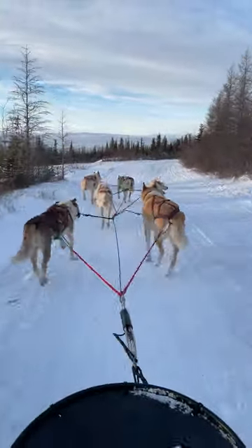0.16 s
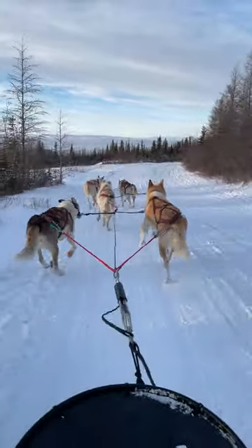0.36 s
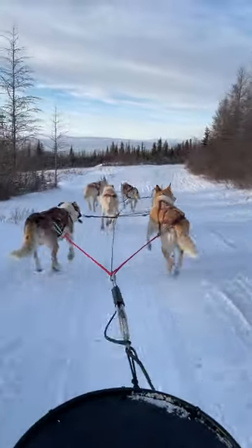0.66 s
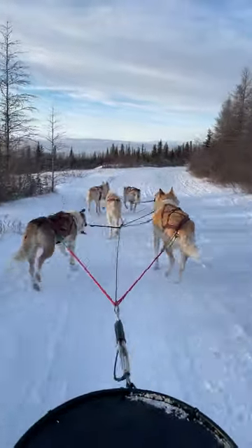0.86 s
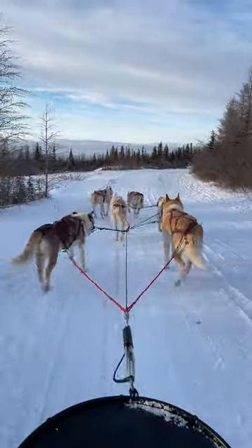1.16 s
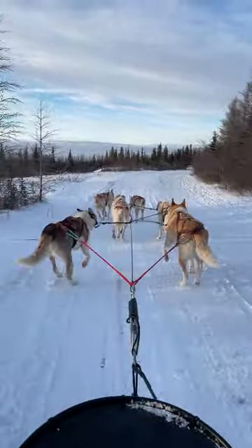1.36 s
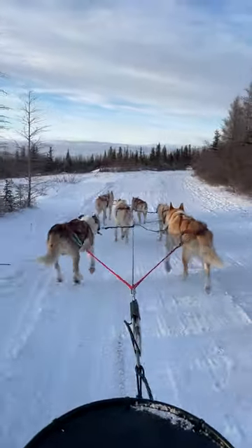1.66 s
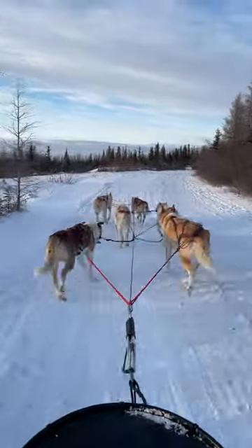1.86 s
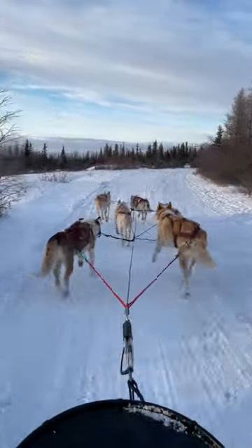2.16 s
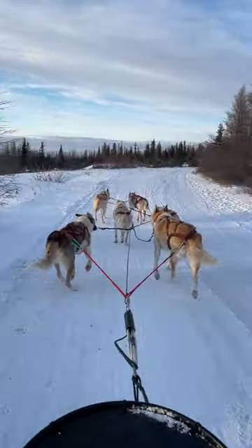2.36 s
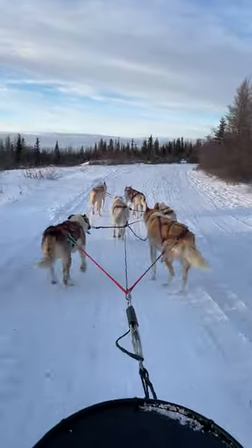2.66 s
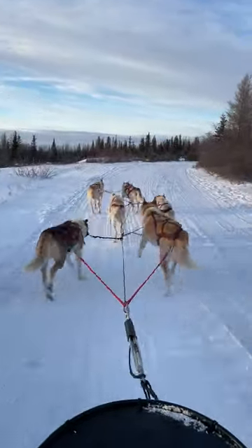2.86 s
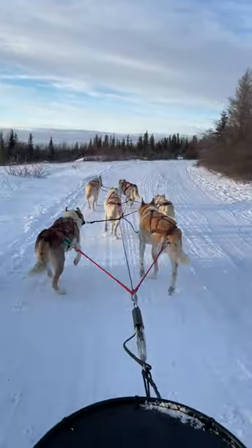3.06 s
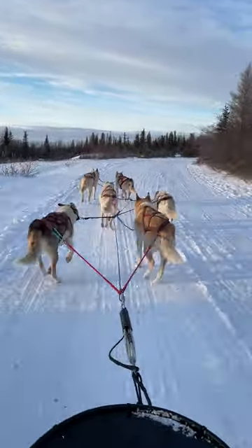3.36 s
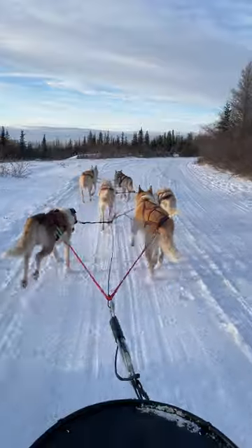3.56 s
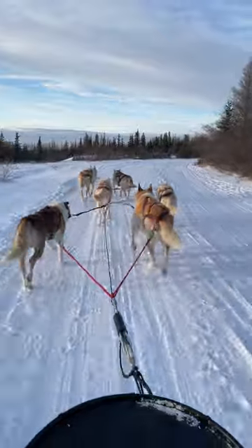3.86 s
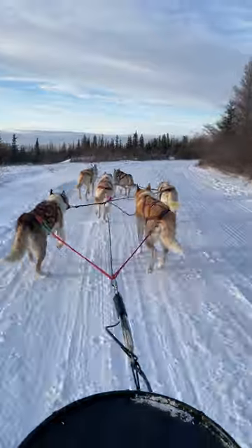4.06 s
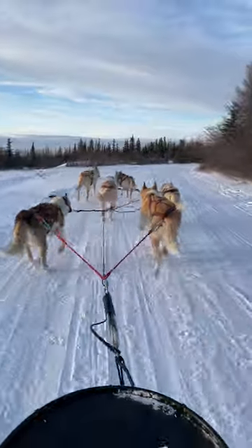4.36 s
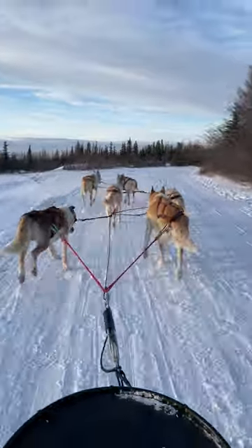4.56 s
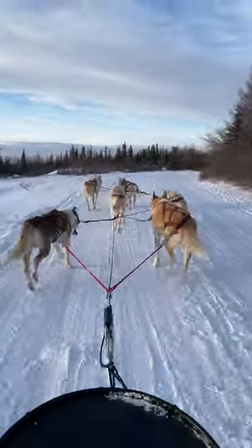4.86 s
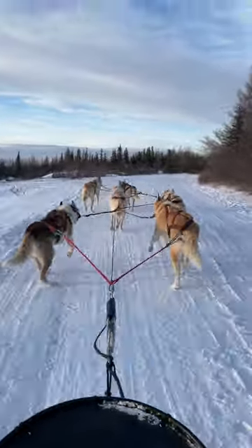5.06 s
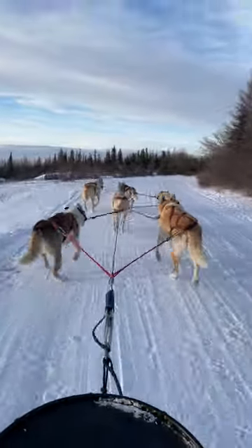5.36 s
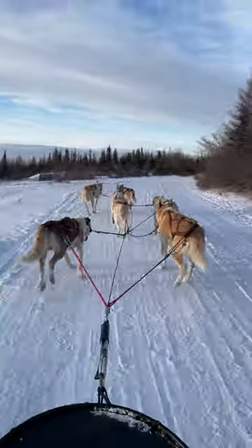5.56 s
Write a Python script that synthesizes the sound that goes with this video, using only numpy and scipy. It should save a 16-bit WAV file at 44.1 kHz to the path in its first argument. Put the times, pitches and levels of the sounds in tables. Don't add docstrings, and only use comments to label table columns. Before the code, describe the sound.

Close on a moving dog sled outdoors: runners scrape and hiss lightly over packed snow with small metallic clicks and soft wooden thumps. After about two seconds the ride roughens, the hull booming and crust crunching. A cluster of hard cracks and slams comes just before four seconds, another heavy knock follows near 4.4, then rough drumming continues. Handheld phone above the bow, wide close stereo, no voices or barking.

```python
import sys
import numpy as np
from scipy import signal
from scipy.fft import rfft, irfft
from scipy.io import wavfile
from scipy.ndimage import uniform_filter1d

SR = 44100
rng = np.random.default_rng(int(sys.argv[2]) if len(sys.argv) > 2 else 0)


def output_pcm(signal):
    pcm = np.clip(np.atleast_2d(signal).T, -1, 1) * 32767
    wavfile.write(sys.argv[1], SR, np.round(pcm).astype(np.int16))


def elevation(decibels):
    levels = np.asarray(decibels, float)
    return 10 ** (levels / 20)


N = 251370


def unit(x):
    return x / np.sqrt(np.mean(x ** 2))


def peak(x, level_db):
    return elevation(level_db) * x / abs(x).max()


def ring(x, hz, width_hz):
    return signal.lfilter(*signal.iirpeak(hz, hz / width_hz, fs=SR), x)


def body(x, modes):
    total = 0
    for k, (hz, width_hz, level_db) in enumerate(modes):
        rung = ring(ring(x, hz, width_hz), hz, 2 * width_hz)
        total = total + (-1) ** k * elevation(level_db) * rung
    return total


def walk(rate_hz):
    hold = int(SR / rate_hz)
    held = np.repeat(rng.standard_normal(N // hold + 1), hold)
    return 1.44 * uniform_filter1d(uniform_filter1d(held, hold), hold)[:N]


def grit(rate_hz, spread_db, smear_s):
    grain_db = spread_db * np.minimum(rng.exponential(size=N), 4)
    hits = (rng.random(N) < rate_hz / SR) * elevation(2 * grain_db)
    power = signal.lfilter([1], [1, -np.exp(-1 / (smear_s * SR))], hits)
    return unit(np.sqrt(power + 0.7 * power.mean()) * rng.standard_normal((2, N)))


def burst(length_ms, edge_ms):
    t_ms = np.arange(int(0.08 * SR)) / SR * 1000
    shape = np.clip(t_ms / edge_ms, 0, 1) * np.exp(-(t_ms / length_ms) ** 3)
    return shape * rng.standard_normal((2, len(t_ms)))


def add(out, start_s, sound):
    i = int(start_s * SR)
    out[..., i:i + sound.shape[-1]] += sound[..., :N - i]


def drum(events, rise_cycles):
    out = np.zeros((2, N))
    for start_s, level_db, pitch_hz, cycles in events:
        phase = rng.random((2, 1))
        n = np.arange(int(3 * SR * cycles / pitch_hz)) * pitch_hz / SR
        swell = (1 - np.exp(-n / rise_cycles)) * np.exp(-(2.27 * n / cycles) ** 1.15)
        add(out, start_s, peak(swell, level_db) * np.sin(2 * np.pi * (n + phase)))
    return out


def trail():
    # start_s, runner_pressure_db, frame_bounce_db, hull_lean_left_minus_right_db, crust_crispness_db
    course = [(0, -41.5, -31, 3.5, -2), (.25, -43, -37.5, -8, 1.5), (.42, -48.5, -39, -2.5, -1.5),
              (.82, -49, -42, -6, 4), (.98, -46.5, -40.5, 1, -1), (1.5, -48, -28, -1, 1),
              (1.8, -46.5, -32, 2, 1), (2.1, -40, -28, -1.5, 1), (2.33, -43, -30, -2, -2.5),
              (2.65, -39.5, -26, -3.5, 1), (3.35, -39, -27.5, -3, -2), (3.78, -39, -28.5, -12, 3),
              (3.86, -46, -27.5, -12, 1), (4.03, -40, -31.5, -3.5, 4.5), (4.5, -37.5, -28.5, -5, -2),
              (5.05, -40, -28.5, -2.5, -2.5), (5.3, -43, -31, -9, 0.5), (5.7, -38, -25, -2, -3)]
    start_s, *columns = np.transpose(course)
    return [np.interp(np.arange(N) / SR, start_s, column) for column in columns]


def ridges():
    # start_s, bite_db, length_ms
    packed = [(.09, 4.5, 140), (.525, 10.5, 106), (.71, 10, 86), (.84, 8, 38), (.905, -1, 50),
              (1.075, 4, 45), (1.13, 5.5, 210), (1.22, 9, 39), (1.313, 8, 45), (1.43, 4, 32),
              (1.505, 6, 70), (1.94, 2.5, 72), (2.09, 3, 154), (2.331, -6, 21), (2.52, 3.5, 150),
              (2.75, 1, 90), (2.81, 2.5, 81), (3.019, 5.5, 44), (3.14, -3, 49), (3.49, 2, 11),
              (3.75, 12.5, 95), (3.86, 11, 160), (3.95, 8.5, 136), (4.41, 4, 21), (5.2, 3, 470),
              (5.51, 0.5, 38), (5.602, 3, 80)]
    rise_share = 0.29
    t_ms = np.arange(N) / SR * 1000
    bite_db = np.zeros(N)
    for start_s, level_db, length_ms in packed:
        x = (t_ms - 1000 * start_s) / length_ms
        distance = np.where(x < 0, -x / rise_share, x)
        bite_db = np.maximum(bite_db, level_db * np.clip(1 - distance, 0, 1))
    return bite_db


def far_hiss():
    modes = [(7600, 5000, -1.5), (15200, 1000, -3.5)]  # pitch_hz, width_hz, level_db
    return unit(body(rng.standard_normal((2, N)), modes)) * elevation(-58)


def squeaks():
    # start_s, level_db, pitch_hz, cycles
    tones = [
        (1.076, -44, 3200, 45),
        (1.785, -38, 1900, 31),
        (2.965, -36, 1530, 25),
    ]
    return drum(tones, rise_cycles=4.4)


def cracks():
    # start_s, level_db
    splinters = [
        (3.7113, -24),
        (3.7507, -22),
        (3.755, -26),
        (3.957, -27),
        (4.205, -30.5),
        (3.3, -33),
        (1.074, -41),
        (1.787, -44),
        (5.6, -38),
        (.524, -39),
    ]
    # pitch_hz, width_hz, level_db
    chip_modes = [(2000, 1400, -1), (4600, 2600, -2), (6300, 1200, -1)]
    out = np.zeros((2, N))
    for start_s, level_db in splinters:
        chip = body(burst(4.2, edge_ms=0.15), chip_modes)
        add(out, start_s, peak(chip, level_db + 2.5))
    return out


def ticks():
    # start_s, level_db, low_db, tail_ms
    snaps = [(0.0977, -15.5, -6, 2.6), (0.103, -25, -12, 1.8), (0.211, -29.5, -6, 2.1),
             (0.2795, -20, -6, 2), (0.361, -34, -14, 3.5), (0.549, -35, -11, 2.1), (0.757, -33, -24, 2.6),
             (2.258, -23, -7, 2.9), (2.8, -35, -18, 1.5), (2.9404, -31, -4, 6.1),
             (3.2996, -30.5, -2.5, 2.4), (3.3928, -30.5, -9, 2.1), (3.436, -22.5, -5, 0.88),
             (3.611, -17.5, -8, 1.7), (3.6506, -20.5, -11, 1.6), (3.6633, -29.5, 8, 4.3),
             (3.681, -13, -8, 1.7), (3.713, -26, 3.5, 1.2), (3.725, -33, -14, 1.8),
             (3.7522, -27.5, -4, 1.9), (3.732, -33, -9, 1.8), (3.765, -14, -5, 3.5), (3.779, -27, -10, 1.6),
             (3.799, -30, -14, 1.6), (3.8977, -28, -10, 1.8), (3.9469, -8, -11.5, 2.4),
             (3.9734, -20.5, -1, 2.1), (4.157, -30, -9, 2.1), (4.2065, -24.5, -6, 1.4),
             (4.2512, -33, -13, 2.1), (5.1933, -23, -0.5, 2.2), (5.227, -16.5, -6, 1.4),
             (5.241, -29, -2, 2.4)]
    # start_s, level_db
    clips = [(0.173, -37.5), (.3094, -35), (1.0755, -38), (1.533, -33), (2.3655, -34.5), (2.385, -39),
             (2.487, -31.5), (2.8753, -38), (3.176, -33), (4.408, -35), (1.788, -47), (5.147, -44),
             (0.525, -45), (4.298, -37), (4.355, -42), (0.471, -34.5)]
    # pitch_hz, width_hz, level_db
    fitting = [(1000, 770, -0.5), (2050, 790, 5.5), (3360, 590, 5), (5180, 970, 1.5), (7450, 1120, -5),
               (9240, 3100, -16)]
    clip_low_db, clip_tail_ms = -25, 4.2
    alike = [(*clip, clip_low_db, clip_tail_ms) for clip in clips]
    out = np.zeros((2, N))
    t_ms = np.arange(int(0.016 * SR)) / SR * 1000
    for start_s, level_db, low_db, tail_ms in list(snaps) + alike:
        snap = 0.22 * rng.standard_normal((2, len(t_ms))) * np.exp(-t_ms / tail_ms)
        snap[:, :3] += [[1, -0.21, -1.13], [1, -1.34, -1.27]]
        low = peak(body(snap, fitting[:2]), low_db + 0.5)
        bright = peak(body(snap, fitting[2:]), 0)
        add(out, start_s - 0.0003, elevation(level_db + 4) * (low + bright))
    return out


def raps():
    # start_s, level_db, pitch_hz, cycles
    blows = [
        (2.509, -20, 1090, 10),
        (2.514, -23, 650, 5),
        (4.408, -19, 1100, 5),
        (4.411, -17, 460, 4),
        (.524, -28.5, 890, 8),
        (1.074, -37, 1200, 5),
        (3.751, -24, 900, 5),
        (5.144, -30, 1060, 5),
        (2.105, -30, 820, 6),
        (2.52, -27, 1000, 10),
    ]
    return drum(blows, rise_cycles=0.3)


def knocks():
    # start_s, level_db, pitch_hz, length_ms, upper_wood_db
    slams = [(0.28, -30, 358, 14, -28), (0.527, -27.5, 450, 14, -30), (1.07, -30.5, 433, 9.1, -21),
             (1.319, -29.5, 420, 20, -20), (2.108, -27.5, 513, 19, -24), (2.508, -23.5, 382, 13.6, -4),
             (2.804, -43, 395, 14, -24), (2.887, -30, 510, 14, -23), (3.132, -31, 503, 20, -8.5),
             (3.33, -37, 350, 20, -2), (3.49, -28.5, 360, 7.6, -26), (3.581, -42, 473, 8.1, -21),
             (3.712, -24, 344, 16, -4), (3.726, -13.5, 690, 13, -28), (3.755, -18, 334, 13, -10),
             (3.789, -29, 350, 18, -9), (3.835, -27, 407, 10, -27), (3.947, -39, 385, 17, 4),
             (4.163, -32, 356, 11, -7.5), (4.25, -35, 524, 12, -9), (4.407, -14, 409, 14.7, -12),
             (5.141, -43, 387, 13, 2), (5.226, -32.5, 366, 38, -7.5), (5.588, -49, 366, 13, -14)]
    # start_s, level_db
    taps = [(.055, -38.5), (0.718, -59), (.899, -33.5), (1.505, -31), (1.786, -58), (2.067, -36),
            (2.428, -49), (4.553, -46), (5.063, -35), (5.192, -54), (5.467, -32.5), (1.133, -32.5),
            (1.241, -38), (1.358, -36), (1.42, -36), (1.70, -36.5), (2.148, -30.5), (2.329, -33),
            (2.358, -36), (2.686, -35), (2.97, -32), (3.02, -34.5), (3.86, -30), (3.978, -41),
            (4.344, -31.5), (5.31, -29)]
    tap_hz, tap_ms, tap_upper_db = 442, 24, -17.5
    alike = [(*tap, tap_hz, tap_ms, tap_upper_db) for tap in taps]
    upper_modes = [(784, 360, 5), (1230, 350, -4), (1900, 840, -17.5)]  # pitch_hz, width_hz, level_db
    out = np.zeros((2, N))
    for start_s, level_db, pitch_hz, length_ms, upper_db in list(slams) + alike:
        lower = body(burst(length_ms, edge_ms=1.75), [(pitch_hz, 0.34 * pitch_hz, 0)])
        upper = body(burst(1.2 * length_ms, edge_ms=0.37), upper_modes)
        wood = peak(lower, level_db + 9) + peak(upper, level_db + upper_db + 13)
        add(out, start_s - 0.001, wood)
    return out


def frame_sway(bounce_db):
    # pitch_hz, width_hz, level_db
    sway_modes = [(53, 30.6, 1.5), (104.4, 55.5, 0.5)]
    # start_s, level_db, pitch_hz, cycles
    thumps = [(0.256, -22.5, 74, 4.1), (1.499, -24, 70, 3.5), (1.859, -22.5, 49.2, 2.2),
              (2.007, -16.5, 61, 5.1), (2.228, -23, 58, 8.4), (2.354, -14.5, 58.4, 4),
              (2.503, -35, 60.4, 2.7), (2.686, -19, 63.7, 3.3), (2.865, -19, 104.4, 4.5),
              (3.009, -19.5, 86, 3.8), (3.127, -18, 68, 4.7), (3.484, -20, 70.0, 2.6),
              (3.923, -19, 115.7, 3.7), (4.126, -28, 57, 3), (4.259, -41, 74.6, 2.3), (4.547, -19.5, 80, 3),
              (5.074, -26, 103, 2.1), (5.523, -10.5, 59, 2.1)]
    sway = unit(body(grit(rate_hz=38, spread_db=3, smear_s=0.032), sway_modes))
    return sway * elevation(bounce_db + 0.87 * walk(20)) + drum(thumps, rise_cycles=0.99)


def crunches():
    # start_s, level_db, length_ms
    lumps_of_crust = [(.059, -41, 21), (0.099, -28, 16), (0.526, -41, 24), (.549, -31, 58), (0.71, -32, 60),
                      (1.076, -30.5, 18), (1.518, -35, 38), (2.15, -28, 130), (2.25, -31.5, 55),
                      (2.512, -26.5, 54), (3.711, -16.5, 13), (3.723, -12.5, 12), (3.751, -18, 26),
                      (3.776, -33, 33), (3.897, -26.5, 35), (4.154, -24.5, 34), (4.33, -29, 16),
                      (4.408, -22, 25), (5.142, -41, 17), (5.229, -27, 11), (.37, -37, 50),
                      (1.19, -36.5, 74), (1.86, -32.5, 110), (2.72, -38, 43), (2.94, -31, 25),
                      (4.205, -41, 9.8), (4.29, -28, 16), (4.86, -31.5, 58), (4.905, -33, 20),
                      (5.30, -30, 55)]
    out = np.zeros((2, N))
    for start_s, level_db, length_ms in lumps_of_crust:
        add(out, start_s, elevation(level_db - 13) * burst(length_ms, edge_ms=0.56))
    return out


def crystal_hiss(hiss_db, bite_db):
    # pitch_hz, level_db_per_hz
    colour = [(1200, -5), (1600, -5), (2000, -0.5), (2200, -3.5), (2500, -8.5), (3400, -8.5), (4100, -10),
              (5000, -9.5), (6500, -15.5), (8000, -15.5), (10000, -24.5), (13000, -30.5), (15500, -37)]
    level_db = hiss_db + 6.5 + 0.41 * bite_db + 0.9 * walk(45)
    shear = grit(rate_hz=330, spread_db=4.5, smear_s=0.0092) * elevation(level_db) + crunches()
    hz, db = np.transpose(colour)
    knots_hz, knots_db = np.r_[700, hz, 16000, 16400], np.r_[-40, db, db[-1], -90]
    log_f = np.log(np.fft.rfftfreq(N, 1 / SR) + 1)
    gain = elevation(np.interp(log_f, np.log(knots_hz), knots_db))
    return irfft(rfft(shear) * gain, N) / np.sqrt(np.mean(gain ** 2))


def slide_ring(hiss_db, bite_db):
    # pitch_hz, width_hz, level_db
    slide_modes = [(2060, 380, 0)]
    rub = unit(body(grit(rate_hz=130, spread_db=3.5, smear_s=0.012), slide_modes))
    return rub * elevation(hiss_db - 5 + 0.91 * bite_db)


def catches():
    # start_s, level_db, length_ms
    snags = [(0.1411, -36, 12.0), (0.16, -42, 12.0), (0.1974, -44, 12.0), (0.2214, -39, 10),
             (0.2994, -37, 12.0), (0.5247, -37, 11), (0.7158, -43, 11), (1.0755, -33.5, 12.0),
             (1.2181, -40, 15), (1.3194, -37, 12.0), (1.4167, -36, 11), (1.508, -33.5, 12.0),
             (1.95, -33, 15), (2.1076, -40, 10), (2.1505, -32, 9.8), (2.577, -32, 12.0), (2.6314, -34, 18),
             (2.6818, -31, 10), (2.7332, -30.5, 12.0), (2.9801, -30.5, 10), (3.1258, -31.5, 12.0),
             (3.1707, -28.5, 11), (3.3293, -30.5, 12.0), (3.7229, -21, 8), (3.7509, -39, 15),
             (3.7913, -27, 12.0), (4.1669, -31, 12.0), (4.4087, -27, 9.3), (4.4214, -38, 12.0),
             (4.6284, -30.5, 16), (4.6668, -29.5, 16), (4.8125, -33.5, 15), (4.9202, -35.5, 20),
             (4.9786, -33, 8.7), (5.009, -37, 11), (5.1457, -31, 11), (5.4405, -26.5, 14),
             (5.4644, -30, 12.0), (5.5024, -32, 9.2), (5.5223, -28.5, 8.7), (5.611, -27.5, 11)]
    # pitch_hz, width_hz, level_db
    catch_modes = [(1990, 156, -12.5), (2048, 160, 10.5), (1360, 1200, -1.5)]
    out = np.zeros((2, N))
    for start_s, level_db, length_ms in snags:
        rasp = body(burst(length_ms, edge_ms=0.66), catch_modes)
        add(out, start_s - 0.001, peak(rasp, level_db + 0.5))
    return out


def runner_scrape(press_db, bite_db):
    # pitch_hz, width_hz, level_db
    runner_modes = [(410.5, 71, 3), (549, 111, -1.5), (712, 175, -4), (933, 204, -6.5), (1286, 334, -13.5)]
    scrape = unit(body(grit(rate_hz=130, spread_db=2, smear_s=0.005), runner_modes))
    return scrape * elevation(-38.5 + 0.84 * press_db + bite_db)


def hull_drumming(press_db, bite_db):
    # pitch_hz, width_hz, level_db
    hull_modes = [(150, 35, 1.5), (208, 50, -1), (250, 53.2, 2), (357, 128, -9.5)]
    # start_s, level_db, pitch_hz, cycles (also slaps and lumps)
    bumps = [(0.762, -17.5, 185, 11), (1.421, -13, 150, 4.8), (2.011, -12.5, 147, 3.1),
             (2.114, -17, 150, 6.3), (2.329, -10.5, 125, 1.7), (2.52, -11, 150, 5), (2.576, -18, 159, 13),
             (2.809, -19, 272, 5.4), (2.998, -16, 203, 4.1), (3.074, -18, 225, 6.8),
             (3.139, -10.5, 153, 2.8), (3.584, -15, 208, 3.1), (3.649, -18, 161, 6.6),
             (3.712, -11, 230, 3.1), (3.757, -7, 238, 4), (3.857, -10.5, 250, 1.2),
             (3.95, -16.5, 236.4, 16), (4.13, -20, 252, 10), (4.327, -15, 158.6, 9.9),
             (4.419, -5, 235, 3.5), (4.499, -19, 252, 4.9), (4.557, -16.5, 130, 4), (4.607, -12, 143, 3.1),
             (4.715, -15.5, 226, 1.5), (4.787, -20, 250, 8.2), (4.992, -19, 222, 2.8),
             (5.126, -17.5, 250, 4.8), (5.196, -15.5, 162, 5), (5.293, -15.5, 243, 4.6),
             (5.533, -19.5, 127, 3.1)]
    slaps = [(2.374, -12, 150, 0.91), (2.523, -3.5, 190, 1.2), (3.717, -5, 198, 2.1),
             (3.792, -6.5, 237, 1.9), (3.808, -6, 200, 1.4), (3.943, -8.5, 107, 0.53),
             (4.419, -30, 215, 2.2), (1.19, -28, 273, 4), (1.385, -22, 292, 7.9), (2.329, -15.5, 380, 4.4),
             (2.356, -29, 445, 3.8), (2.44, -22.5, 195, 4.7), (2.812, -13.5, 385, 3.8),
             (3.489, -14.5, 410, 4.1), (3.857, -15, 330, 4)]
    lumps = [(0.084, -20.5, 215, 3.8), (0.234, -23, 205, 5.5), (0.421, -24.5, 214, 2.2),
             (0.511, -22, 220, 1.3), (0.673, -22, 213, 2.4), (0.846, -24.5, 141, 4.2),
             (0.988, -29, 140, 3.2), (1.048, -18.5, 208, 2), (1.124, -22.5, 184, 2.1),
             (1.217, -20, 153, 3.0), (1.324, -20.5, 112, 3.3), (1.534, -22, 110, 3.2), (1.7, -21, 208, 8.6),
             (1.884, -24, 111, 3.7), (2.688, -34, 113, 3.0), (2.74, -12, 136, 2.8), (2.919, -19, 148, 2.5),
             (3.257, -30, 202, 2.4), (3.879, -15, 283, 3.5), (4.038, -19.5, 157, 4), (4.22, -27, 209, 4.2),
             (4.619, -18.5, 124, 2.8), (4.794, -18, 110, 2.8), (4.871, -20, 245, 8.4),
             (5.096, -18.5, 133, 1.5), (5.459, -19, 240, 1.9), (5.631, -23, 253, 4.7),
             (5.662, -19, 250, 6.1), (5.69, -13.5, 255, 12)]
    rumble = unit(body(grit(rate_hz=120, spread_db=1.5, smear_s=0.013), hull_modes))
    rumble = rumble * elevation(-30 + 0.76 * press_db + 0.88 * bite_db)
    hits = drum(bumps, rise_cycles=0.29) + drum(slaps, rise_cycles=0.17)
    return rumble + hits + elevation(-0.5) * drum(lumps, rise_cycles=0.82)


def hull_swings():
    # start_s, level_db, pitch_hz, cycles
    swings = [(.76, -18.5, 185, 5.7), (.812, -23, 195, 4.2), (3.964, -14.5, 250, 6), (3.985, -16, 245, 8.8),
              (3.905, -19, 270, 4.8), (5.11, -23, 145, 5), (5.16, -19, 149, 3.6), (4.43, -18.5, 197, 3.5),
              (1.395, -21, 289, 6), (2.165, -19, 230, 5.2), (3.69, -19, 212, 3)]
    return drum(swings, rise_cycles=0.8)


def ports(paths):
    # pitch_hz, likeness_0_to_1, left_minus_right_db
    port_pair = [(0, 0.99, -1), (70, 0.84, 1), (150, 0.54, -6), (250, 0.56, -13), (450, 0.77, -4),
                 (718, 0.8, -4.5), (796, 0.53, -6), (1480, 0.35, -1), (2064, 1, 1.5), (2500, 0, 0.5),
                 (3200, 0.37, -5), (4230, 0.58, -4), (5100, 0.76, 1.5), (7100, 0.95, 0), (7660, 1, -1.2),
                 (12600, 1, 1), (16000, .98, -1)]
    phase_turn = [(0, 0), (200, .2), (330, -2.9), (750, -3.1), (1150, -3.6), (1500, -4.3), (1750, -5.7),
                  (2400, -5.9), (3000, -7.5), (4350, -7.2), (4750, -5.8), (6600, -8.1), (7100, -9.15),
                  (8100, -9.7), (8600, -10.3), (11100, -12.57), (14100, -15.71), (16000, -17.4)]
    f = np.fft.rfftfreq(N, 1 / SR)
    hz, like, tilt_db = np.transpose(port_pair)
    like, tilt_db = np.interp(f, hz, like), np.interp(f, hz, tilt_db)
    turn = np.exp(1j * np.interp(f, *np.transpose(phase_turn)))
    first, second = rfft(paths)
    right = like * turn * first + np.sqrt(1 - like ** 2) * second
    return irfft(np.array([first * elevation(tilt_db / 2), right * elevation(-tilt_db / 2)]), N)


def scene():
    press_db, bounce_db, pan_db, crisp_db = trail()
    press_db = press_db - press_db.mean()
    bite_db = ridges()
    hiss_db = -52 + 0.7 * press_db + crisp_db
    fittings = squeaks() + cracks() + ticks() + raps() + knocks()
    snow = far_hiss() + crystal_hiss(hiss_db, bite_db) + slide_ring(hiss_db, bite_db) + catches()
    rest = fittings + snow + frame_sway(bounce_db) + runner_scrape(press_db, bite_db)
    hull = hull_drumming(press_db, bite_db) + hull_swings()
    lean = elevation(np.array([pan_db + 6, -pan_db - 6.5]) / 2)
    return ports(rest) + lean * ports(hull)


def top_cut(x):
    return signal.sosfilt(signal.butter(12, 15900, fs=SR, output="sos"), x)


def record(dry):
    dry = signal.sosfilt(signal.butter(2, 30, "high", fs=SR, output="sos"), dry)
    dry = signal.sosfilt(signal.ellip(8, 0.2, 50, 15750, fs=SR, output="sos"), dry)
    return top_cut(np.tanh(0.98 * dry) / 0.99)


dry = scene()
out = record(dry)
output_pcm(out)
```